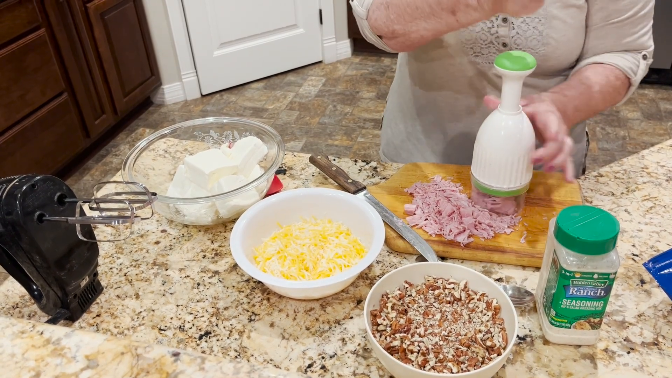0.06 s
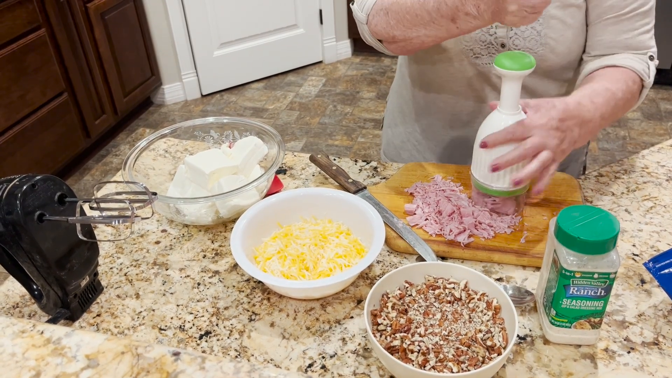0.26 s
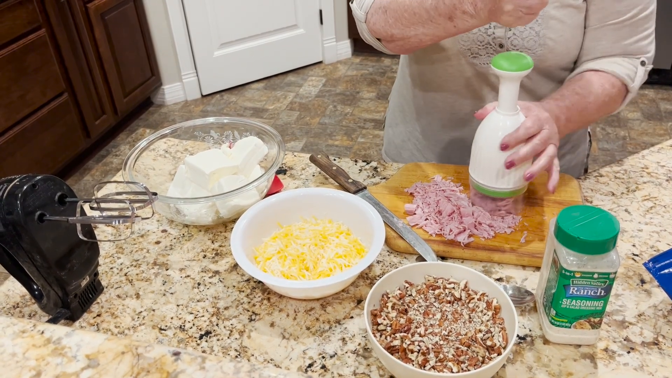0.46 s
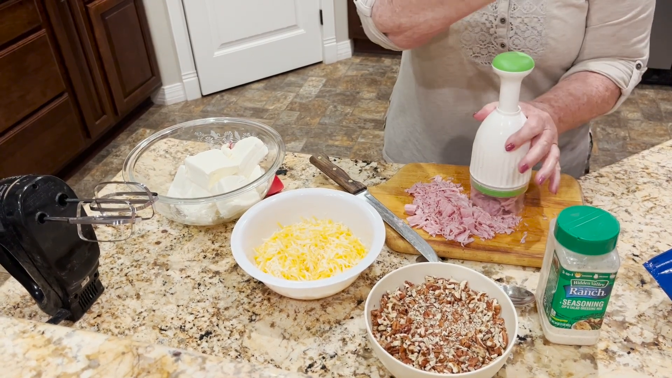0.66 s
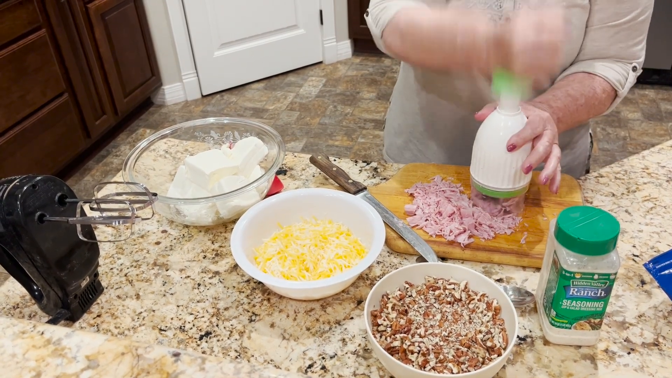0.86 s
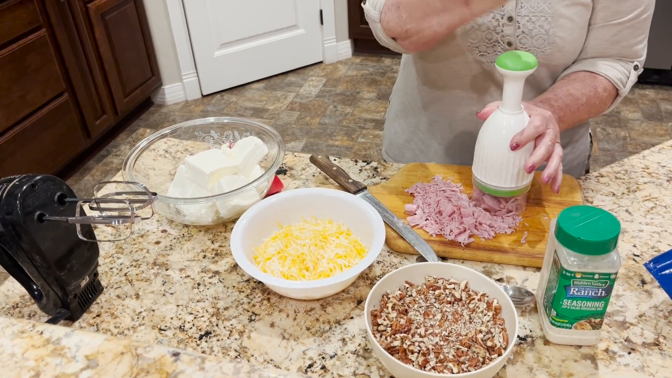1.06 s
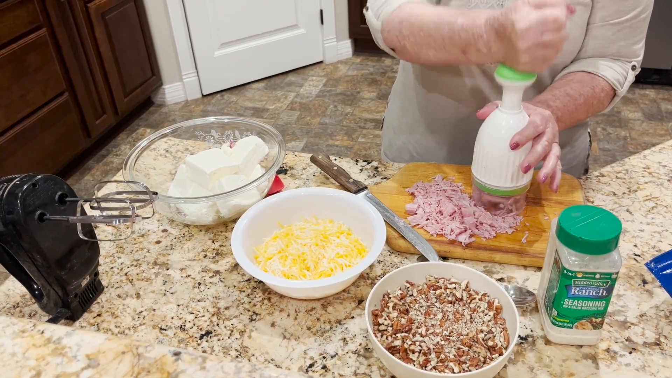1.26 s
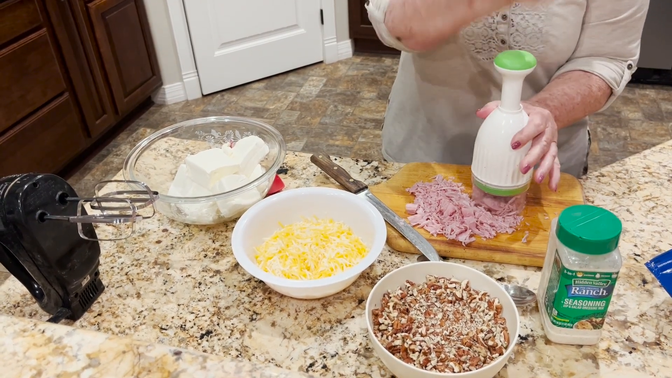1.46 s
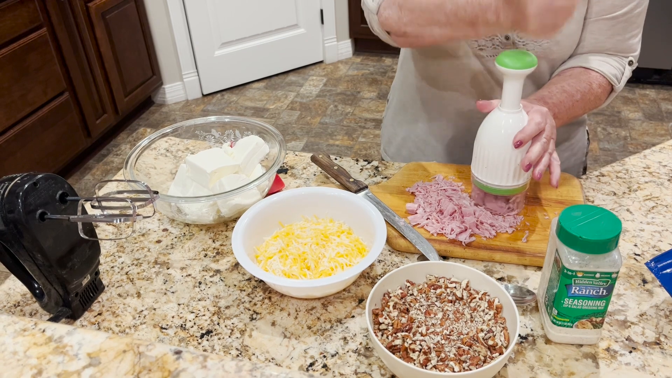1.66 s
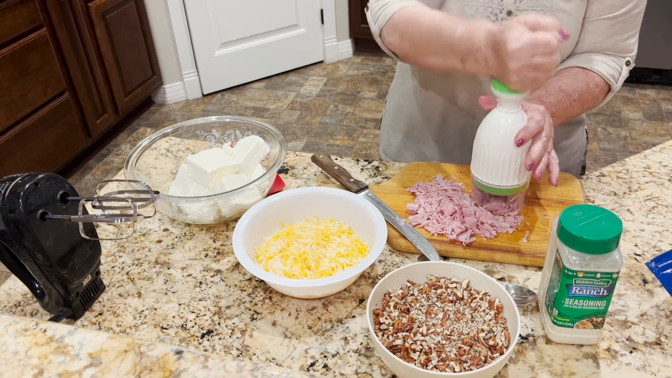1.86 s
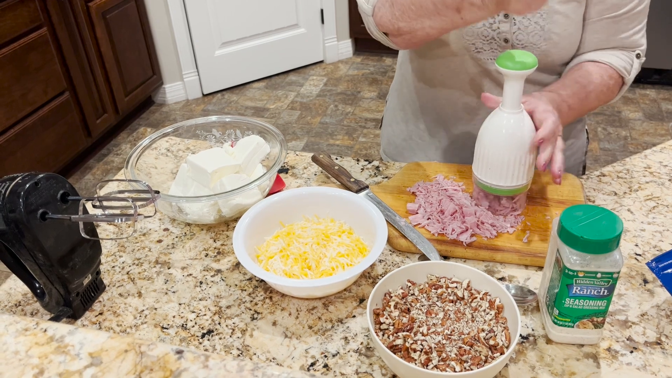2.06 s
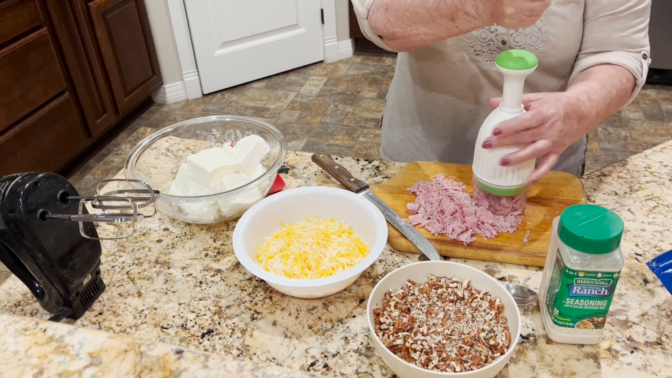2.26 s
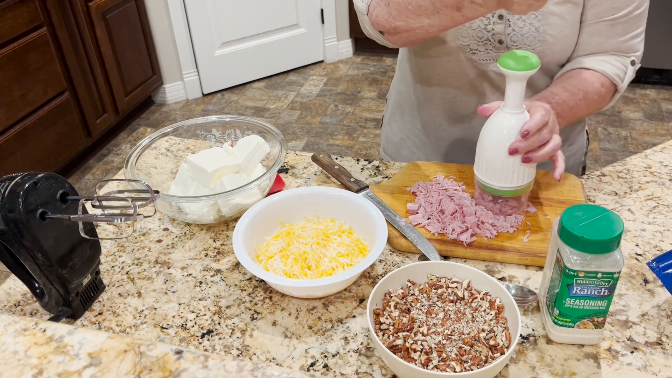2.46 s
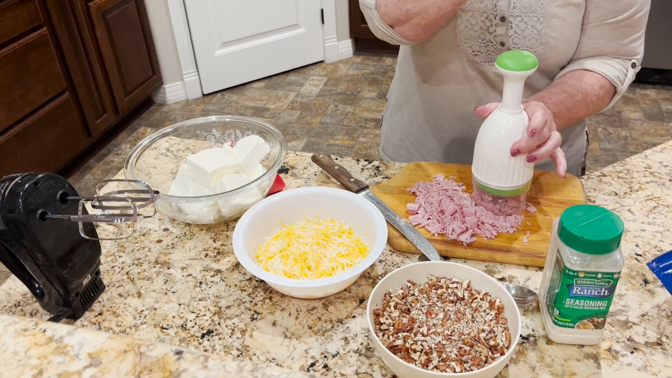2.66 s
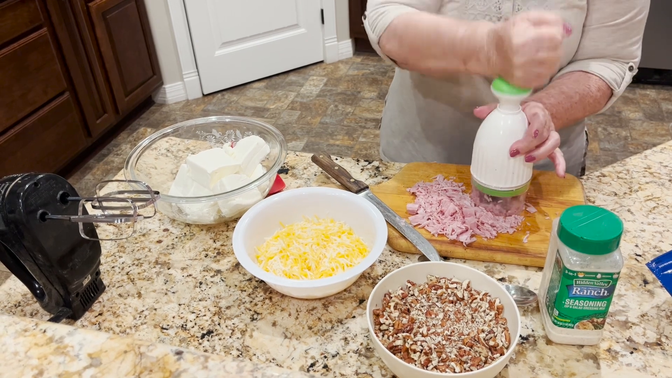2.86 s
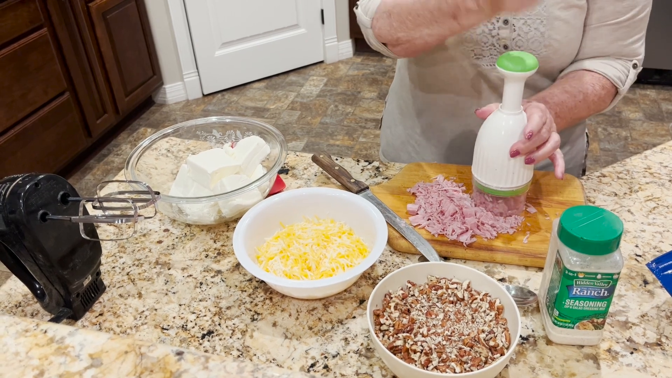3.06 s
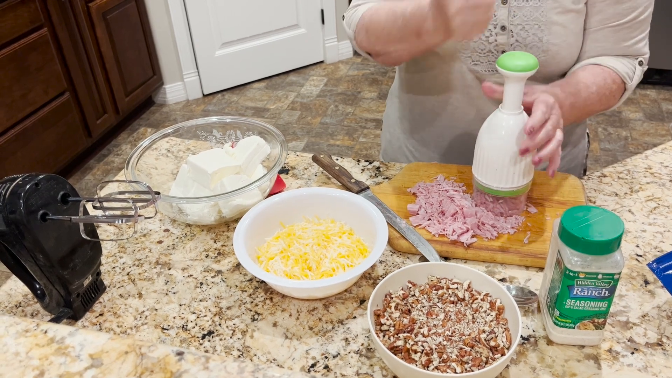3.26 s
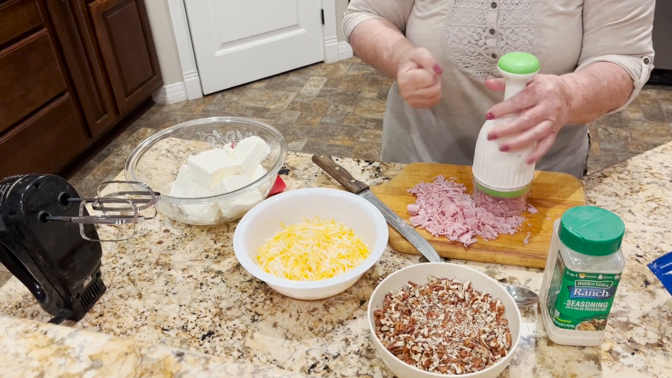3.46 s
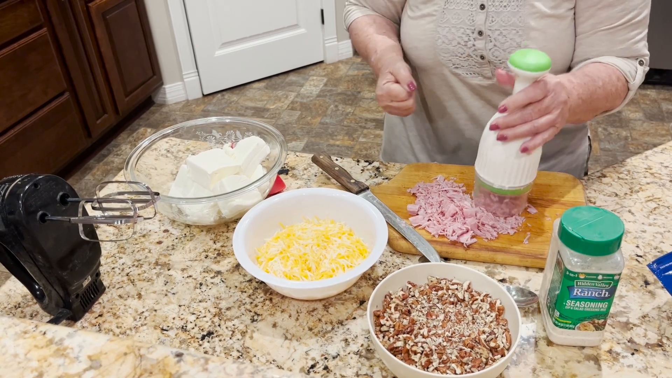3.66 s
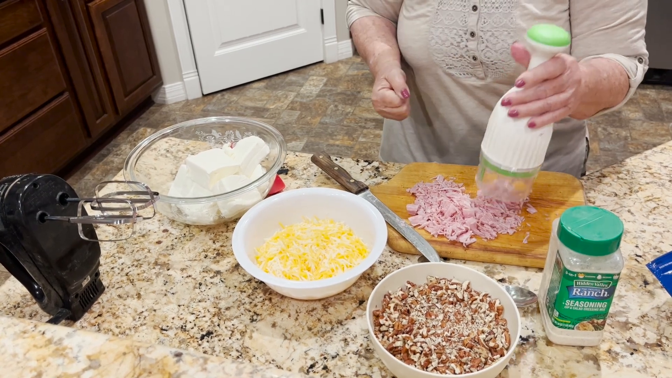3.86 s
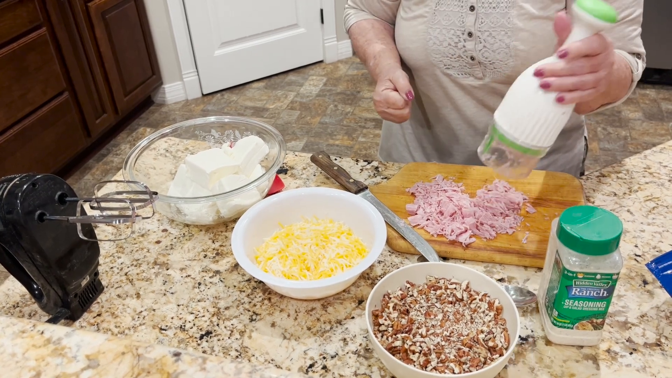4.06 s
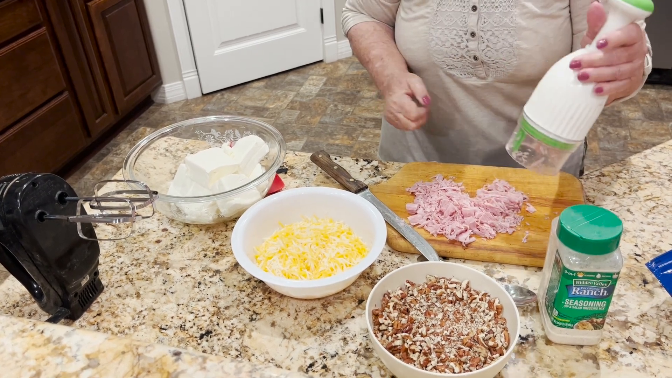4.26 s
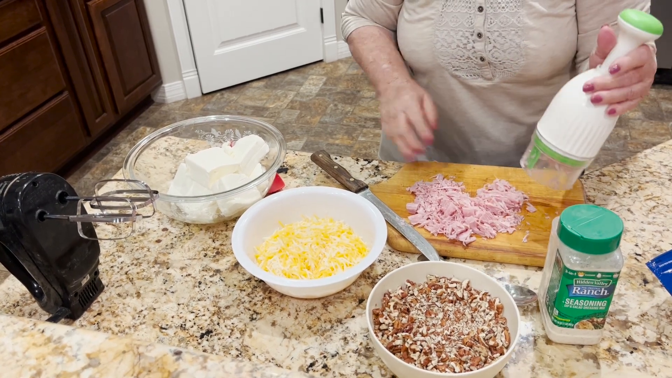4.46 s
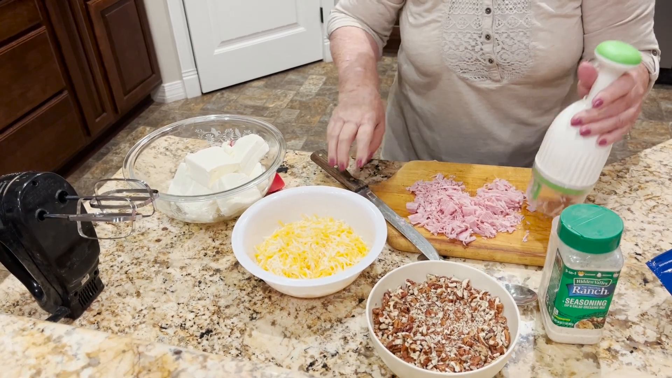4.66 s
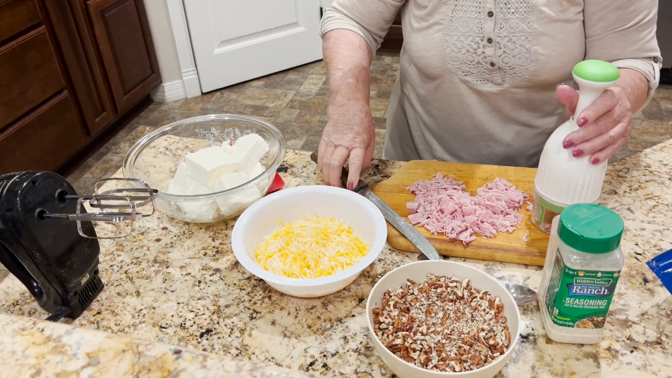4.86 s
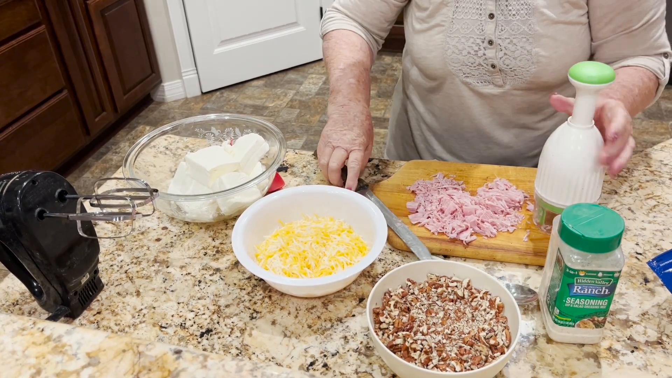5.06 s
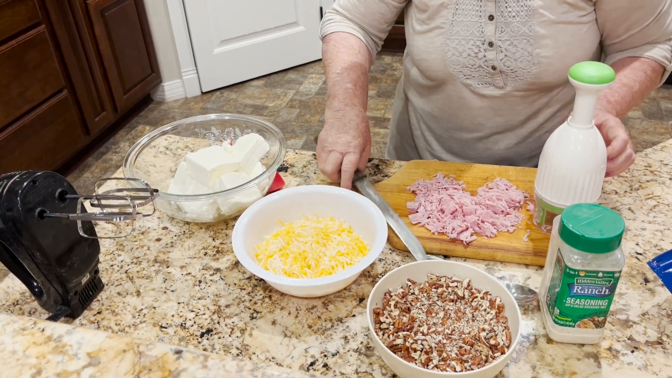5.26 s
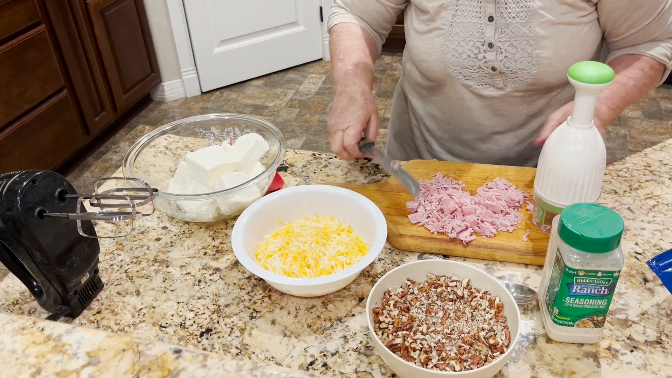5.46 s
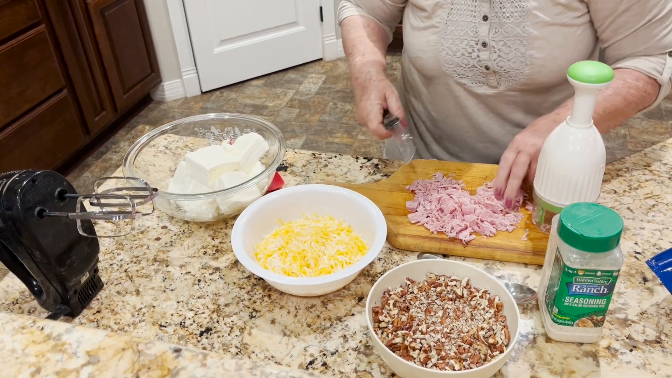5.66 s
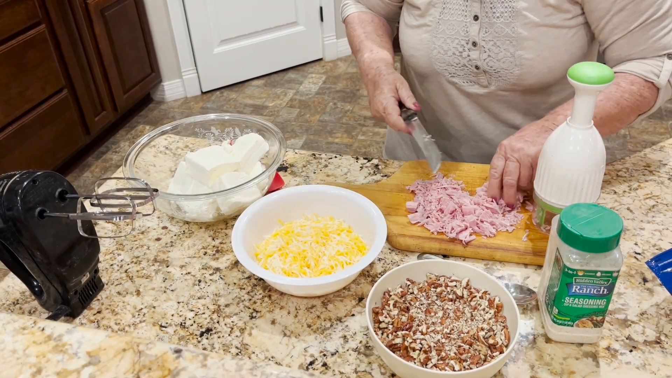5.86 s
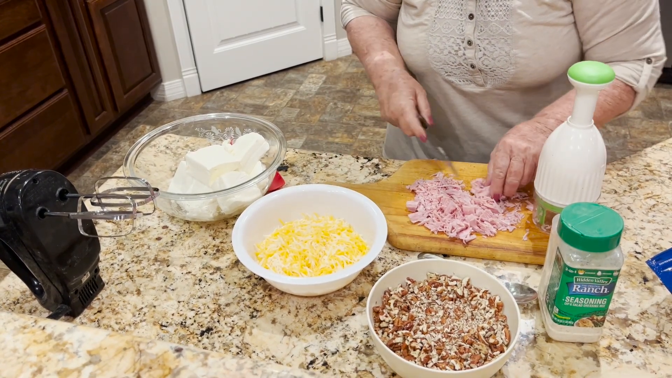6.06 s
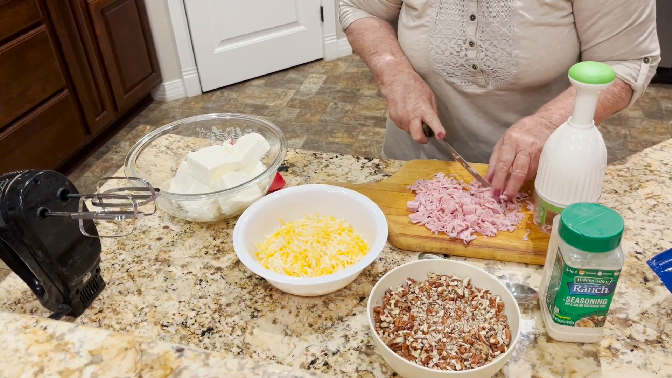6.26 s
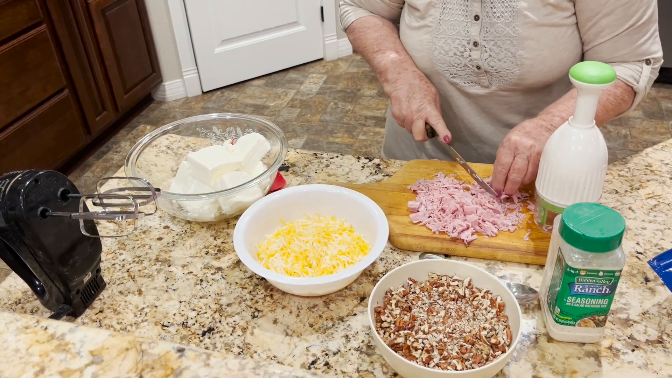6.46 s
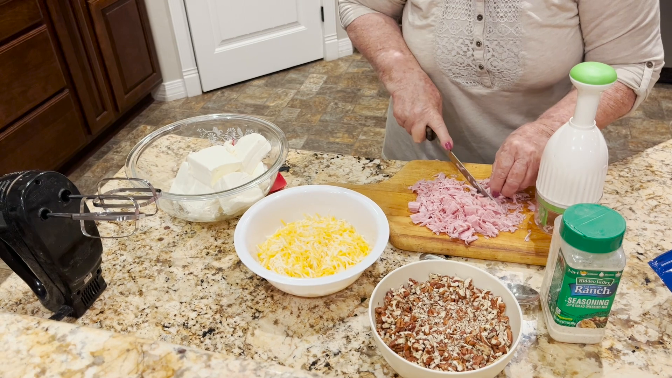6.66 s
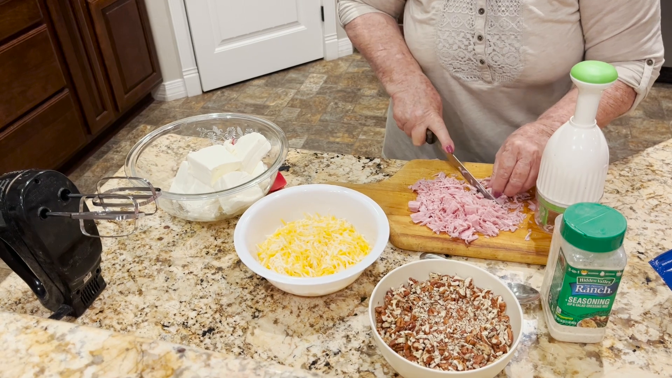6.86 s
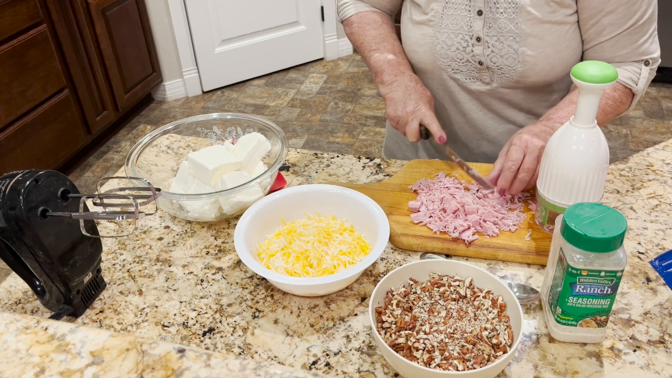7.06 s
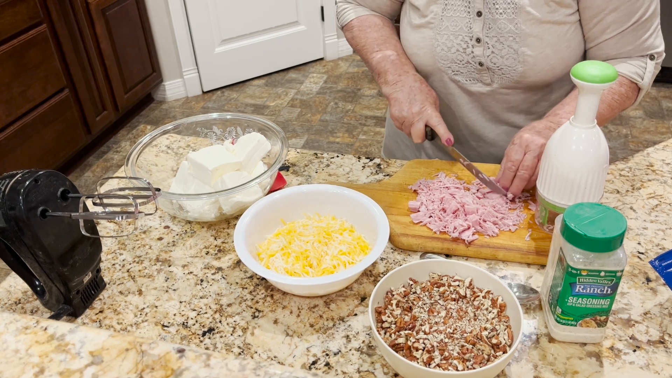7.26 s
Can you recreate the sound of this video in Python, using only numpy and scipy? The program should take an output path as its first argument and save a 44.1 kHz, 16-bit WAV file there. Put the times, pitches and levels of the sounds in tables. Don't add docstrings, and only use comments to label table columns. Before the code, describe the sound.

A hand-pumped food chopper cracks hard against a wooden board in five loud clacking strokes, then is set down with a knock and faint knife scraping.

```python
import sys
import numpy as np
from scipy import signal
from scipy.fft import rfft, irfft, next_fast_len
from scipy.io import wavfile
from scipy.ndimage import uniform_filter1d

SR = 44100
rng = np.random.default_rng(int(sys.argv[2]) if len(sys.argv) > 2 else 0)


def unload_wav(signal):
    wavfile.write(
        sys.argv[1],
        SR,
        np.round(np.clip(np.atleast_2d(signal).T, -1, 1) * 32767).astype(np.int16),
    )


def boost(x):
    u = np.asarray(x, float) / 20
    return 10 ** u


N = 322812

# start_s, peak_db, brightness_db_per_octave
KNOB_SLAPS = [
    (0.834, -9, 7.5),
    (1.1572, -8.5, -1.5),
    (1.4823, -6.5, 1.5),
    (1.8042, -14, 2.5),
    (2.801, -6, 5),
]
# start_s, peak_db
RATCHET_CLICKS = [(0.8483, -4.5), (1.1702, -3.5), (1.496, -2), (1.8148, -11.5), (2.8153, -2.5)]
# start_s, force_db, brightness_db_per_octave
BLADE_HITS = [(0.858, -2.6, -2), (1.1814, -1.74, -1.2), (1.505, -2, -1.9), (1.8237, 2, -3.5),
              (2.823, 0.8, -2.5)]
# start_s, peak_db, spring_lag_s, spring_db
PLUNGER_STOPS = [(0.943, -8.5, .0036, -4), (1.279, -10.5, .002, 2.5), (1.606, -10, .0018, -4),
                 (1.933, -9.5, .0062, -1.5), (2.965, -8, 0.0046, 0)]
# echo_db, boom_db
EARLIER_STROKE = (-19.5, -17)
# rub_db, rattle_db
PLUNGER_RUB = (-24, -30)
# start_s, peak_db, ring_hz, crack_db, room_send_db
LIGHT_KNOCKS = [(0.751, -50, 304.1, -35, -10), (2.345, -34, 260, -30, 7.5), (3.513, -33, 707.4, -23, -5),
                (3.59, -29.5, 588, -45, -3.3), (4.736, -17.5, 757, -5, -2.5),
                (4.746, -19, 547, -11.5, -0.5), (4.755, -15, 374, -10, -3.3),
                (6.663, -19.5, 1306, -63, -0.3), (7.261, -61, 333, -32.5, 1.8),
                (5.05, -40, 1207, -13, -2.5), (5.069, -38.5, 982, -34, 3)]
# start_s, peak_db
STEEL_CLINKS = [(4.9688, -57), (5.1855, -40.5), (5.1991, -34.5)]
# start_s, peak_db
MINCE_SMACKS = [(6.4503, -50), (6.4648, -50.5), (6.4757, -60), (6.527, -57), (6.5514, -54), (6.5814, -55.5),
                (6.6323, -49), (6.7098, -44), (6.8038, -63), (6.8916, -55), (6.9471, -58), (6.9614, -55),
                (6.9955, -56), (7.0104, -58)]
# start_s, hold_s, level_db
HAND_SLIDES = [(0.28, .19, -70.5), (2.35, 0.078, -61), (3.38, 0.17, -82), (5.7, 0.23, -73),
               (6.63, .09, -75.5), (6.87, .04, -73)]
# start_s, hold_s, level_db
KNIFE_EDGE = [(6.66, 0.04, -68.5), (6.824, 0.11, -65.5)]
# start_s, hold_s, level_db
KNIFE_DRAG = [(6.77, 0.21, -62.5)]
# start_s, hold_s, level_db
MINCE_FIZZ = [(6.5, .1, -81.5), (6.63, 0.118, -75), (6.82, .2, -81)]

# pitch_hz, level_db
SLAP_COLOUR = [(500, -16.5), (2000, -14), (4200, 9), (7000, -6.5), (10000, 2), (14000, -4.5),
               (16500, -16.5)]
KNOB_COLOUR = [(200, -19.5), (500, 1), (850, 0), (1400, -6), (2500, -14), (6000, -36.5)]
RATCHET_COLOUR = [(500, -7.5), (2000, -7), (4700, -1), (7000, -2.5), (11000, -3), (14000, -3.5),
                  (16500, -8.5)]
BLADE_COLOUR = [(200, -10), (700, -12), (1500, -0.5), (2100, 0), (3500, 1.5), (4800, -2), (6500, -26.5),
                (13000, -35.5)]
SPRING_COLOUR = [(300, 3.5), (1000, -8), (2200, -2), (3600, -1), (5000, -9.5), (7000, -18.5), (12000, -23),
                 (16000, -31.5)]
STOP_COLOUR = [(120, -21.5), (300, -1), (450, -1.5), (800, -9), (2000, -20.5), (6000, -22), (12000, -29.5),
               (16000, -35)]
CRACK_COLOUR = [(800, -13.5), (1800, 2.5), (3200, 0.5), (6000, -9), (12000, -16.5), (16000, -35)]
EARLIER_COLOUR = [(150, -10.5), (300, 8.5), (700, -5), (1300, -2.5), (2200, -2), (4500, -5.5), (7000, -17),
                  (12000, -20.5)]
CLINK_COLOUR = [(1000, -2), (2500, -7), (4500, -5.5), (6500, 6), (9000, -5.5), (13000, -14), (16000, -16)]
SMACK_COLOUR = [(2000, -30.5), (5000, -15), (10000, -6.5), (14000, -0.5), (16000, -10.5)]
RUB_COLOUR = [(300, -9.5), (900, 19.5), (2500, 8.5), (5000, 3.5), (8000, -1.5), (12500, -1), (15000, -1.5),
              (16500, -28.5)]

# pitch_hz, level_db, t60_s
COUNTER_MODES = [(69.8, -0.5, 0.62), (97, -9, 0.6), (56.2, -16.5, .45), (124.8, -17.5, 0.5),
                 (82, -12, 0.11), (65, -8.5, 0.27)]
# pitch_hz, level_db, t60_s
HOUSING_MODES = [(305, 1, 0.04), (320, -10.5, 0.17), (704, -9.5, 0.075)]
# pitch_hz, width_hz, level_db
BODY_MODES = [(1450, 540, 1.5), (1910, 75, 2.5), (2040, 44, -8), (3030, 86, 5.5), (3558, 14, -10),
              (4230, 72, -9.5), (4540, 56, -15)]
# pitch_hz, width_hz, level_db
BOARD_MODES = [(1240, 110, 17.5), (2900, 690, -27)]
# pitch_hz, t60_s
KITCHEN_DECAY = [(100, 0.5), (400, .8), (1500, 0.76), (4500, 0.6), (7000, 0.47), (10000, 0.4), (14500, 0.4)]
# pitch_hz, level_db
ECHO_COLOUR = [(100, 2.5), (600, -1.12), (4000, -6.5), (7000, -3), (8600, -16.5), (10500, -8.5),
               (14300, -12.5), (16000, -34)]
# pitch_hz, likeness (1 = same)
STEREO_LIKENESS = [(90, 0.99), (300, 0.85), (700, 0.42), (1400, 0.27), (2800, 0.84), (6500, 0.22),
                   (8300, 0.21), (14000, 0.98)]
# pitch_hz, level_db
ROOM_COLOUR = [(18, -42.5), (40, -8.5), (110, -7), (230, -11), (500, -28), (1320, -39), (2600, -54),
               (13000, -65)]
# pitch_hz, width_hz, level_db
FRIDGE_LINES = [(109.7, 28, -48.5), (211, 45, -57), (245, 24, -70), (421, 3.7, -65)]
# pitch_hz, lead_radians
PORT_LEAD_CURVE = [(300, .1), (1300, .6), (2400, -1.1), (4500, -0.29)]
# pitch_hz, level_db
PORT_TILT_CURVE = [(60, -1.4), (700, -2.2), (1400, -1.6), (2800, 2.3), (5500, 2.8), (8000, -0.5)]


def unit(x):
    return x / np.sqrt(np.mean(x ** 2) + 1e-20)


def along(points, hz):
    f, v = np.transpose(points)
    return np.interp(np.log(hz + 1), np.log(f + 1), v)


def filtered(x, response):
    m = next_fast_len(x.shape[-1] + 4096)
    spectrum = rfft(x, m) * response(np.fft.rfftfreq(m, 1 / SR))
    return irfft(spectrum, m)[..., :x.shape[-1]]


def peak(f, hz, width):
    return 1j * f * width / (hz * hz - f * f + 1j * f * width)


def shade(colour, tilt_db=0):
    return lambda hz: boost(along(colour, hz) + tilt_db * np.log2((hz + 50) / 2500))


def tinted(x, colour, tilt_db):
    return filtered(x, shade(colour, tilt_db))


def half_turn(hz):
    return np.arccos(np.clip(along(STEREO_LIKENESS, hz), -1, 1)) / 2


def spread(pair):
    mid, side = filtered(pair, lambda hz: np.array([np.cos(half_turn(hz)), np.sin(half_turn(hz))]))
    return np.array([mid + side, mid - side])


def add(bus, s, x):
    part = bus[..., round(s * SR):][..., :x.shape[-1]]
    part += x[..., :part.shape[-1]]


def room_tone():
    rumble = boost(-48.5) * unit(tinted(rng.standard_normal((2, N)), ROOM_COLOUR, 0))
    lines = 0
    for hz, width, db in FRIDGE_LINES:
        noise = rng.standard_normal((2, N))
        lines = lines + boost(db) * unit(filtered(noise, lambda f: peak(f, hz, width) * 600 / (f + 600)))
    return spread(rumble + lines)


def echoes(gain, modes=(), first_db=10, first_s=.005):
    size = 2 ** 15
    f = np.fft.rfftfreq(size, 1 / SR)
    ripple_db = np.interp(f, np.arange(160) * 110, 2.5 * rng.standard_normal(160))
    resonance = sum(boost(db) * np.abs(peak(f, hz, w)) ** 2 for hz, w, db in modes)
    favoured = boost(ripple_db) * (1 + resonance)
    turn = half_turn(f)
    noise = rfft(rng.standard_normal((2, size)))
    mid, side = unit(irfft(noise * gain(f) * favoured * [np.cos(turn), np.sin(turn)]))
    hz, t, z = signal.stft(np.array([mid + side, mid - side]), SR, nperseg=256)
    decay_db = along(ECHO_COLOUR, hz)[:, None] - 60 * t / along(KITCHEN_DECAY, hz)[:, None]
    x = signal.istft(z * boost(decay_db), SR, nperseg=256)[1]
    t = np.arange(x.shape[1]) / SR
    x = x * boost(first_db * np.exp(-t / first_s) - 2) * np.clip(t / 0.001, 0, 1)
    return np.pad(x, ((0, 0), (round(.012 * SR), 0)))


def ring(modes, rise, seconds):
    t = np.arange(round(SR * seconds)) / SR
    tones = sum(boost(db - 60 * t / t60) * np.sin(2 * np.pi * hz * t) for hz, db, t60 in modes)
    return (1 - np.exp(-t / rise)) * tones


def boom():
    return ring(COUNTER_MODES, rise=.004, seconds=0.99)


def burst(colour, tilt_db, rise, t60):
    t = np.arange(SR // 12) / SR
    same, stray = rng.standard_normal((2, len(t)))
    stray = 0.44 * filtered(stray, lambda hz: hz / (hz + 800) / (1 + (hz / 9500) ** 4))
    puff = tinted(np.array([same + stray, same - stray]), colour, tilt_db)
    x = puff * boost(-60 * t / t60) * (1 - np.exp(-t / rise))
    return x / np.abs(x).max()


def chopper():
    near, far = np.zeros((2, 2, N))
    earlier_echo_db, earlier_boom_db = EARLIER_STROKE
    rub_db, rattle_db = PLUNGER_RUB
    add(near, 0, boost(earlier_echo_db) * echoes(shade(EARLIER_COLOUR), BODY_MODES)[:, SR // 20:])
    add(near, 0, boost(earlier_boom_db) * boom()[SR // 20:])
    for slap_row, click_row, blade_row, stop_row in zip(
            KNOB_SLAPS, RATCHET_CLICKS, BLADE_HITS, PLUNGER_STOPS):
        slap, slap_db, bright = slap_row
        click, click_db = click_row
        blade, force_db, dull = blade_row
        stop, stop_db, lag, snap_db = stop_row
        echo_force_db = 0.1 * force_db
        contacts = [  # start_s, peak_db, echo_db, colour, tilt_db_per_octave, rise_s, t60_s
            (slap, slap_db, slap_db - 16, SLAP_COLOUR, bright, .0004, .012),
            (slap + .0026, slap_db + 0.66, -5 + 0.39 * force_db, KNOB_COLOUR, 0, .001, .03),
            (click, click_db, -5.5 + echo_force_db, RATCHET_COLOUR, 0, .0006, .016),
            (blade, -0.4, 5 + echo_force_db, BLADE_COLOUR, dull, .0006, .015),
            (stop + lag, snap_db, -1.5, SPRING_COLOUR, 0, .0003, .011),
            (stop, stop_db, stop_db + 3, STOP_COLOUR, 0, .002, .03)]
        for s, db, echo_db, colour, tilt_db, rise, t60 in contacts:
            add(near, s, boost(db + 1.0) * burst(colour, tilt_db, rise, t60))
            add(far, s, boost(echo_db - 21.5) * echoes(shade(colour, tilt_db), BODY_MODES))
        add(near, blade + .0142, boost(force_db - 9) * boom())
        add(near, stop + 0.013, boost(-24) * boom())
        shaft_rub = burst(RATCHET_COLOUR, -0.75, 0.0056, 0.067)[:, :round((blade - slap) * SR)]
        add(near, slap, boost(rub_db) * unit(shaft_rub))
        rattle = burst(RUB_COLOUR, -1.5, .001, 0.15)[:, :400]
        add(near, stop, boost(rattle_db) * unit(rattle))
        add(near, stop, boost(stop_db) * ring(HOUSING_MODES, rise=0.0016, seconds=.08))
    return near, far


def limiter(depth_db=9, release=0.023):
    t = np.arange(N) / SR
    since = [t - s for s, *rest in BLADE_HITS + PLUNGER_STOPS]
    return boost(-depth_db * sum((u > 0) * np.exp(-np.abs(u) / release) for u in since))


def strokes(rows, rise_db_per_s, fall_db_per_s):
    t = np.arange(N) / SR
    gain = 0
    for s, hold, db in rows:
        swell_db = rise_db_per_s * np.clip(s - t, 0, 9)
        fade_db = fall_db_per_s * np.clip(t - s - hold, 0, 9)
        gain = gain + boost(db - swell_db - fade_db)
    return gain


def friction(grain_db=1.5):
    lumps = boost(grain_db * unit(uniform_filter1d(rng.standard_normal((4, N)), 150)))
    grit = lumps * rng.standard_normal((4, N))
    slide = boost(12) * unit(tinted(spread(grit[:2]), RUB_COLOUR, 0))
    board = unit(filtered(grit[2], lambda f: sum(boost(db) * peak(f, hz, w) for hz, w, db in BOARD_MODES)))
    edge = unit(filtered(grit[3], lambda f: peak(f, 4460, 410) ** 2))
    wet_lumps = boost(6 * unit(uniform_filter1d(rng.standard_normal(N), 60)))
    fizz = unit(tinted(wet_lumps * grit[:2], SMACK_COLOUR, 0))
    return (strokes(MINCE_FIZZ, 348, 308) * fizz
            + strokes(HAND_SLIDES, 348, 308) * slide
            + strokes(KNIFE_DRAG, 600, 133) * board
            + strokes(KNIFE_EDGE, 702, 340) * edge)


def knocks():
    bus = np.zeros((2, N))
    for s, db, hz, crack_db, wet_db in LIGHT_KNOCKS:
        wood = [(hz / 3, -16), (hz / 1.5, -5), (hz, 0), (1.3 * hz, -5), (2.0 * hz, -17), (8 * hz, -45)]
        crack_tilt_db = .15 * (db + 20)
        tone = ring([(hz, -1.5, .045)], rise=0.00027, seconds=1 / 12)[:SR // 12]
        body = tone + burst(wood, 0, 0.00081, 0.034)
        crack = boost(crack_db + 7.5) * burst(CRACK_COLOUR, crack_tilt_db, 0.00055, 0.036)
        add(bus, s, boost(db) * (body + crack))
        wood_gain, crack_gain = shade(wood), shade(CRACK_COLOUR, crack_tilt_db)
        room = echoes(lambda f: wood_gain(f) + boost(crack_db - 3.5) * crack_gain(f))
        add(bus, s, boost(db + wet_db - 15.5) * room)
        boom_db = db - 16 + 2 - 5.5 * np.log2(hz / 400)
        add(bus, s + 0.0031, boost(boom_db) * boom())
    for s, db in STEEL_CLINKS:
        add(bus, s, boost(db + 7.5) * burst(CLINK_COLOUR, 0, 0.00025, 0.012))
        add(bus, s, boost(db - 18.5) * echoes(shade(CLINK_COLOUR, -1.6)))
    for s, db in MINCE_SMACKS:
        add(bus, s, boost(db + 3.0) * burst(SMACK_COLOUR, 0.6, 0.00023, .006))
    return bus


def scene():
    near, far = chopper()
    return near + limiter() * boost(3.5) * far + knocks() + friction() + room_tone()


def low_pass(x):
    return signal.sosfilt(signal.butter(12, 16560, fs=SR, output="sos"), x)


def record(dry):
    def ports(hz):
        lead = along(PORT_LEAD_CURVE, hz) + 2 * np.pi * .000139 * np.clip(hz - 4200, 0, None)
        halves = np.array([[.5], [-.5]])
        return boost(along(PORT_TILT_CURVE, hz) * halves) * np.exp(-1j * lead * halves)

    left, right = filtered(dry, lambda hz: ports(hz) / np.sqrt(1 + (50 / (hz + 1)) ** 12))
    mid = filtered((left + right) / 2, lambda hz: boost(-6 / (1 + ((hz - 8550) / 850) ** 6)))
    x = mid + np.array([left - right, right - left]) / 2
    x = x / (1 + np.abs(x) ** 8) ** (1 / 8)
    mix = filtered(x, lambda hz: 1 / (1 + (hz / 16300) ** 40))
    return low_pass(mix)


dry = scene()
out = record(dry)
unload_wav(out)
```